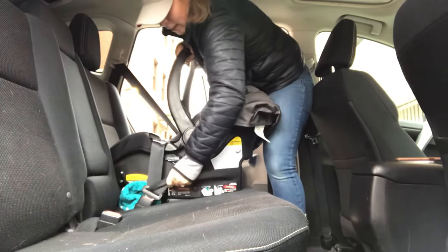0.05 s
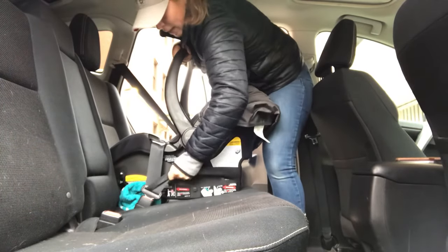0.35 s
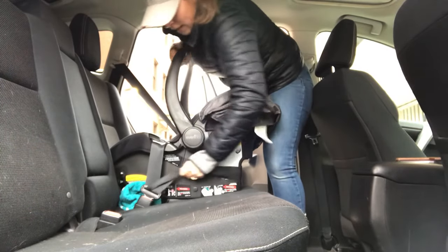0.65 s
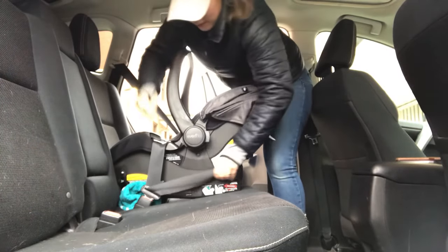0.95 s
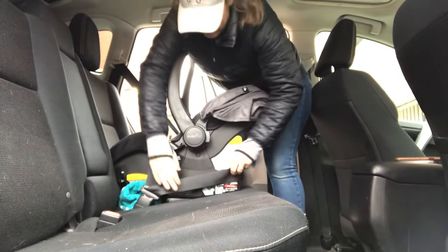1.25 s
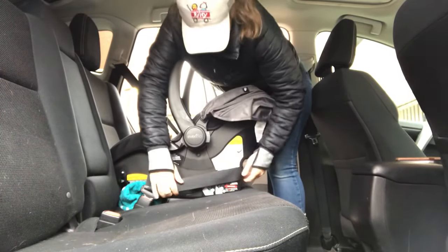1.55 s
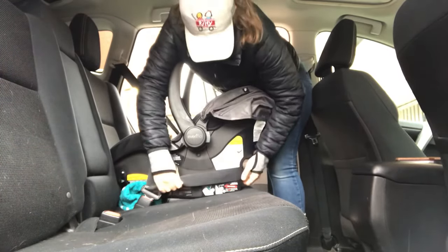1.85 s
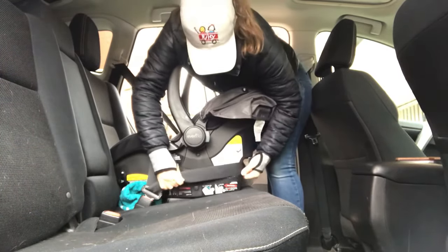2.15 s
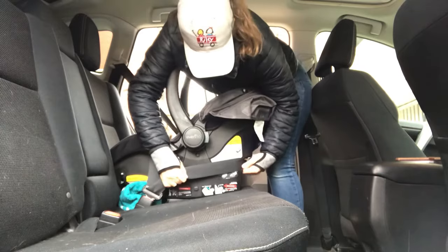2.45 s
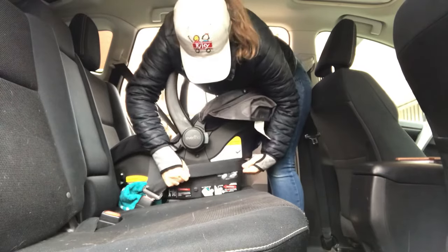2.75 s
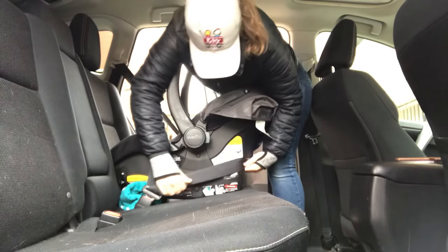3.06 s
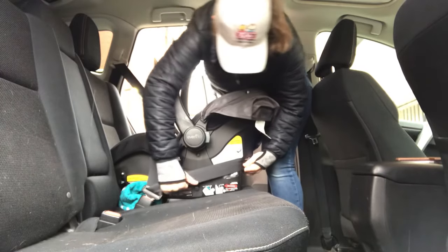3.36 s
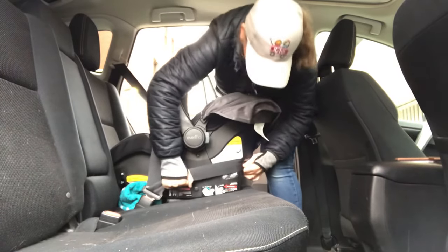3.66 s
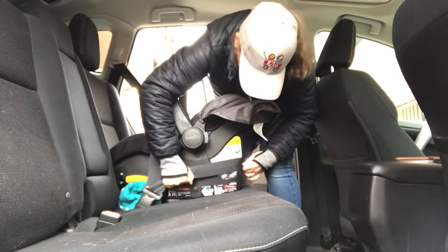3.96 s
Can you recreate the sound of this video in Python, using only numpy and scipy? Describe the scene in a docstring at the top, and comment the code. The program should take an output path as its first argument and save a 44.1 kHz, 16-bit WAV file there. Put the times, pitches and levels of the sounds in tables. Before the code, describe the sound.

Inside a parked car, a seat belt is tugged around a child seat with small ticks and hollow knocks, followed by two latch snaps and a short tightening zip. Close jacket rustling, a low hum and dull traffic continue underneath.

```python
"""Buckling a child seat

Inside a parked car a seat belt is drawn across a child seat. The belt ticks as it runs out and
rasps through its guide, the plastic shell knocks, and a latch snaps twice, the second time sharply.
Then the belt zips tight. A padded nylon jacket swishes with every reach, over a steady machine hum
and the rumble of traffic."""
import sys
import numpy as np
from scipy import signal
from scipy.fft import rfft, irfft, next_fast_len
from scipy.io import wavfile
from scipy.ndimage import map_coordinates

SR = 44100
rng = np.random.default_rng(int(sys.argv[2]) if len(sys.argv) > 2 else 0)


def digitize_waveform(pressure):
    """Quantize a signal to 16-bit integers and store it at the path in sys.argv[1].

    Rows of a 2-D input are taken as channels; values are limited to [-1, 1].
    """
    field = np.atleast_2d(pressure).T
    bounded = np.clip(field, -1, 1)
    quanta = np.round(bounded * 32767).astype(np.int16)
    wavfile.write(sys.argv[1], SR, quanta)


N = 176400  # 4 seconds

# Tugs on the belt: start_s, length_s, level_db, tilt_db_per_octave, ring_hz, ring_boost_db
BELT_TUGS = [(0.092, 0.048, -55, -1, 7000, 0), (0.476, 0.18, -62, -4, 4030, 8),
             (0.687, 0.046, -49.5, -2.5, 4570, 7), (0.751, 0.016, -45, 1.5, 2980, 6),
             (0.78, 0.025, -49.5, 0, 2300, 3), (0.951, 0.087, -55.5, -0.5, 2870, 9),
             (1.093, 0.029, -54.5, 3.5, 11500, 2), (3.16, 0.303, -60, -5, 2050, 7)]
# The rasp's tone colour (how strong its lows and highs are): pitch_hz, level_db
RASP_COLOUR = [(200, -23), (700, -1), (2400, -1), (3400, -4), (4400, -4), (6000, -9.5), (8000, -10.5),
               (9500, -10), (10400, -20), (11500, -15), (15500, -26)]
# Where every rasp rings: pitch_hz, width_hz, boost_db
RASP_PEAKS = [(2060, 130, 3), (2950, 84, 4.5), (3860, 170, 5.5), (4620, 140, 4), (5480, 150, 10),
              (6900, 170, 8.5), (8380, 88, 0), (9200, 170, 3), (11700, 160, 6), (14400, 150, 8)]
# The one pull that tightens the belt: start_s, length_s, level_db
TIGHT_PULL = (2.999, 0.085, -48.5)
# Tone colour of that pull: pitch_hz, level_db
PULL_COLOUR = [(200, 4), (750, 2.5), (1400, -1.5), (2400, -1), (3100, -2.5), (4000, -9), (6500, -13.5),
               (9800, -12.5), (10500, -16.5), (15500, -19)]
# Where the tight belt rings: pitch_hz, width_hz, boost_db
PULL_PEAKS = [(1160, 51, 5.5), (5150, 130, 10), (6000, 90, 4), (6750, 120, 5), (7380, 100, 5),
              (11300, 200, 9), (13500, 200, 6), (15220, 130, 9)]
# Ticks of the running belt: start_s, level_db
BELT_TICKS = [(0.015, -52), (.049, -55), (.066, -52.5), (.085, -52), (.152, -49.5), (.1715, -48),
              (.187, -54), (0.2028, -49.5), (0.226, -54), (.231, -57), (0.251, -53.5), (.2838, -54.5),
              (.3152, -54), (0.337, -57), (.3595, -58), (.4145, -56), (.5008, -55), (.519, -67),
              (1.8735, -49.5), (2.0594, -47.5), (2.5755, -53.5), (2.786, -54.5)]
# Tone colour of a tick: pitch_hz, level_db
BELT_TICK_COLOUR = [(500, -23), (2000, 9), (4000, 1.5), (6500, 0.5), (9000, -6.5), (10400, -11),
                    (11800, -7), (15500, -13)]

# Snaps of the latch: start_s, level_db, treble_cut_hz, bass_cut_hz
LATCH_SNAPS = [(1.0554, -33, 6040, 2200), (2.6278, -31, 19000, 400)]
# Notes the latch rings at: pitch_hz, level_db, fade_s (time to fall by 60 dB)
LATCH_NOTES = [(1448, -7, 0.026), (2200, -13, .03), (4000, -12, 0.015), (4650, -0.5, 0.028),
               (5720, -11, .018), (5900, -9, .016), (6930, -5, 0.025), (7700, -9, 0.029),
               (8700, -13, 0.014), (9640, -4, 0.012), (10140, -15, 0.01), (12500, -3, 0.0087),
               (13400, -10, .013)]
# Tone colour of the latch's crack: pitch_hz, level_db
LATCH_COLOUR = [(300, -5), (1400, 4), (3500, 1.5), (7000, 0), (10000, -1.5), (11500, -8.5), (13300, -10),
                (15500, -15)]
# Knocks on the plastic shell: start_s, level_db, tilt_db_per_khz
SHELL_KNOCKS = [(0.0222, -46, 2), (.038, -38, -0.5), (.4622, -27, -0.3)]
# Notes the shell rings at: pitch_hz, level_db, fade_s
SHELL_NOTES = [(783, -4, 0.03), (1335, 2, 0.017), (1520, -3.5, 0.025), (2140, -5, 0.016),
               (3090, -10, 0.013), (3820, -12, .02)]
# Tone colour of the shell's crack: pitch_hz, level_db
SHELL_COLOUR = [(300, -3), (900, -8), (1600, 11.5), (4000, -8), (7500, -12), (10000, -24), (15500, -28)]

# How loud the jacket swishes: time_s, level_db
SWISH_LEVELS = [(0, -65.5), (.2, -78), (.43, -75), (.52, -62.5), (.63, -53.5), (.82, -55.5), (.88, -58),
                (1.0, -53.5), (1.12, -55), (1.2, -54), (1.5, -55), (1.62, -59), (1.72, -65.5), (1.85, -61),
                (2.0, -58.5), (2.16, -56.5), (2.25, -63), (2.36, -68), (2.49, -67.5), (2.55, -60.5),
                (2.62, -71), (2.7, -64.5), (2.78, -63), (2.83, -74), (2.95, -59.5), (3.15, -57),
                (3.38, -54), (3.52, -57.5), (3.6, -61.5), (3.68, -58.5), (3.8, -68), (4, -86)]
# Tone colour of rubbing nylon: pitch_hz, level_db
SWISH_COLOUR = [(300, 7), (1100, 2.5), (2150, 3), (2700, -2), (3450, 2), (4800, -4), (5400, -3.5),
                (6000, -5), (6600, -4.5), (7700, -10), (9600, -13.5), (10400, -20), (11400, -11.5),
                (15500, -21)]
# Tone colour of the nylon's fine fizz: pitch_hz, level_db
FIZZ_COLOUR = [(2000, -25), (6000, 4), (9000, 2), (10400, -1), (12000, -4), (15500, -1)]

# Tones of the steady hum: multiple (of HUM_HZ), level_db
HUM_TONES = [(1, -40.5), (2, -49.5), (5, -66)]
# Tones of the fan's whine: pitch_hz, level_db
FAN_TONES = [(236, -55), (635.5, -71), (678, -74.5), (706, -73), (1051, -70.5), (2049, -76.5), (3084, -98)]
# How loud the traffic is: time_s, level_db
RUMBLE_LEVELS = [(0, -40.5), (.45, -40.5), (.7, -42), (1.4, -42.5), (1.8, -41.5), (2.5, -41.5), (3.2, -42),
                 (3.8, -41.5), (4, -40)]
# Tone colour of traffic heard inside the car: pitch_hz, level_db
RUMBLE_COLOUR = [(20, -21), (30, -12), (50, -3), (65, 1), (100, -1.5), (142, -0.5), (155, -5.5), (190, -5),
                 (270, -9.5), (350, -15), (420, -17), (520, -22), (750, -23.5), (1200, -25), (1800, -34.5),
                 (3500, -45), (7000, -52), (10300, -59.5), (15500, -61)]
# How long the cabin echoes: pitch_hz, fade_s
CABIN_FADES = [(200, 0.17), (2000, 0.086), (10000, 0.04)]

BRISK_DB, FIZZ_DB, FIZZ_GROWTH = -55.5, -9.5, 1.4  # a brisk swish; fizz relative to it; dB per swish dB
HUM_HZ, TOP_HZ = 120, 15830
CABIN_DB, BOUNCE_DB = -12, -21


def belt_rasps():
    """Each tug drags the weave over the guide in a short grainy rasp with a ring of its own."""
    out, t = np.zeros(N), np.arange(SR // 2) / SR
    for start_s, length_s, db, tilt_db, ring_hz, ring_db in BELT_TUGS:
        peaks = list(RASP_PEAKS) + [(ring_hz, 310, ring_db)]  # the ring is 310 Hz wide
        rasp = noise(RASP_COLOUR, len(t), grain_db=5, tilt_db=tilt_db, peaks=peaks)
        add(out, start_s, amp(db) * stroke(t, length_s) * rasp)
    return out


def belt_zip():
    """Pulled tight, the belt zips through the guide and rings."""
    out, t = np.zeros(N), np.arange(SR // 4) / SR
    start_s, length_s, db = TIGHT_PULL
    rasp = noise(PULL_COLOUR, len(t), grain_db=6.5, peaks=PULL_PEAKS)
    add(out, start_s, amp(db) * stroke(t, length_s) * rasp)
    return out


def belt_ticks():
    """The belt catches and slips in small dry ticks."""
    out, t = np.zeros(N), np.arange(SR // 16) / SR
    shape = rise(t, attack_s=0.00051) * fade(t, fade_s=0.032)
    for start_s, db in BELT_TICKS:
        add(out, start_s, amp(db) * shape * noise(BELT_TICK_COLOUR, len(t)))
    return out


def latch_snaps():
    """The latch snaps and rings; the softer snap is duller and thinner."""
    out = np.zeros(N)
    for start_s, db, treble_cut_hz, bass_cut_hz in LATCH_SNAPS:
        snap = strike(LATCH_NOTES, LATCH_COLOUR, crack_db=0, crack_fade_s=0.03)
        band = lambda hz: hz / np.hypot(hz, bass_cut_hz) / np.hypot(1, (hz / treble_cut_hz) ** 2)
        add(out, start_s, amp(db) * filtered(snap, band))
    return out


def shell_knocks():
    """Tight hollow knocks on the child seat, each with its own brightness."""
    out = np.zeros(N)
    for start_s, db, tilt_db in SHELL_KNOCKS:
        knock = strike(SHELL_NOTES, SHELL_COLOUR, crack_db=-7, crack_fade_s=0.024)
        tilt = lambda hz: amp(tilt_db * np.minimum(hz, 5000) / 1000)
        add(out, start_s, amp(db) * filtered(knock, tilt))
    return out


def strike(notes, colour, crack_db, crack_fade_s):
    """One hard hit: a few fading notes and a noisy crack whose treble dies first."""
    t = np.arange(SR // 8) / SR
    ring = sum(amp(db + rng.normal()) * fade(t, fade_s) * sine(hz, t) for hz, db, fade_s in notes)
    burst = noise(colour, len(t))
    body = filtered(burst, lambda hz: 1 / (1 + (hz / 10700) ** 4))
    treble = burst - body
    crack = body * fade(t, crack_fade_s) + treble * fade(t, 0.75 * crack_fade_s)
    return (ring + amp(crack_db) * crack) * rise(t, attack_s=0.0003)


def jacket_swish():
    """Nylon slides on nylon; brisk moves add a fine fizz, so faster sounds brighter."""
    level_db = over_time(SWISH_LEVELS) + 0.6 * wobble(34.97)
    swish = amp(level_db) * noise(SWISH_COLOUR, N, grain_db=3)
    fizz_db = BRISK_DB + FIZZ_DB + FIZZ_GROWTH * (level_db - BRISK_DB)
    return swish + amp(fizz_db) * noise(FIZZ_COLOUR, N)


def machine_hum():
    """A low electrical-sounding hum holds steady; a fan adds a faint, slightly unsteady whine."""
    t = np.arange(N) / SR
    fan_time = t + 0.0021 * np.cumsum(wobble(6)) / SR  # the fan's tones drift together
    tone = lambda hz, db, time: amp(db + 0.5 * wobble(12)) * np.sqrt(2) * sine(hz, time)
    hum = sum(tone(round(multiple) * HUM_HZ, db, t) for multiple, db in HUM_TONES)
    whine = sum(tone(hz, db, fan_time) for hz, db in FAN_TONES)
    return hum + whine


def traffic_rumble():
    """Traffic outside makes a dull rumble that swells a little."""
    level_db = over_time(RUMBLE_LEVELS) + 0.58 * wobble(9)
    return amp(level_db) * noise(RUMBLE_COLOUR, N)


def cabin_echo(x):
    """The padded cabin answers with a short echo that loses its treble first."""
    hz, t, bands = signal.stft(rng.standard_normal(SR // 5), SR, nperseg=128)
    fading = bands * fade(t, over_pitch(CABIN_FADES, hz)[:, None])
    tail = signal.istft(fading, SR, nperseg=128)[1]
    echo = np.pad(tail / np.linalg.norm(tail), (SR // 500, 0))  # arrives 2 ms late
    return signal.fftconvolve(x, echo)[:N]


def with_bounces(x, count=6, delay_s=0.00202, drift_s=0.00015):
    """Add bounces off the seat and door; their paths shift slowly as the arms move."""
    delays = [delay_s * rng.uniform(0.2603, 1) + drift_s * wobble(1.91) for _ in range(count)]
    bounces = sum(map_coordinates(x, [np.arange(N) - delay * SR], order=3) for delay in delays)
    gain = amp(BOUNCE_DB)
    return (x + gain * bounces) / np.sqrt(1 + count * gain ** 2)


def noise(colour, size, grain_db=0, tilt_db=0, peaks=()):
    """Shaped noise of strength 1; grain_db makes it rougher, tilt_db (per octave) brighter."""
    grains = rng.standard_normal(size) * amp(grain_db * rng.standard_normal(size))
    boost = lambda hz: sum(db / (1 + ((hz - centre) / width) ** 2) for centre, width, db in peaks)
    octaves = lambda hz: np.log2(np.maximum(hz, 500) / 1000)
    shaped = filtered(grains, lambda hz: amp(over_pitch(colour, hz) + boost(hz) + tilt_db * octaves(hz)))
    return shaped / np.sqrt(np.mean(shaped ** 2) + 1e-20)


def stroke(t, length_s, release_s=0.012):
    """The loudness of one pull: a quick start, a hold and a short fade."""
    return rise(t, attack_s=0.0014) * np.exp(-np.maximum(t - length_s, 0) / release_s)


def rise(t, attack_s):
    """Climb from 0 towards 1."""
    return 1 - np.exp(-t / attack_s)


def fade(t, fade_s):
    """Fall by 60 dB every fade_s seconds."""
    return amp(-60 * t / fade_s)


def sine(hz, t):
    """A pure tone that starts anywhere in its cycle."""
    return np.sin(2 * np.pi * (hz * t + rng.random()))


def wobble(rate):
    """A smooth curve through rate random points a second."""
    points = rng.standard_normal(int(N * rate / SR) + 4)
    return map_coordinates(points, [np.arange(N) * rate / SR])


def amp(db):
    """Turn decibels into a multiplier."""
    return 10 ** (np.asarray(db) / 20)


def over_time(table):
    """Join a table's points into one value for each sample."""
    return np.interp(np.arange(N) / SR, *np.transpose(table))


def over_pitch(table, hz):
    """Read between a table's pitches, giving each octave equal room."""
    pitches, values = np.transpose(table)
    return np.interp(np.log(hz + 1), np.log(pitches + 1), values)


def filtered(x, gain_at):
    """Turn each frequency up or down by gain_at(hz)."""
    size = next_fast_len(len(x) + 8192)
    hz = np.fft.rfftfreq(size, 1 / SR)
    return irfft(rfft(x, size) * gain_at(hz), size)[:len(x)]


def add(track, start_s, sound):
    """Mix a sound into the track at start_s."""
    part = track[max(round(start_s * SR), 0):][:len(sound)]
    part += sound[:len(part)]


def scene():
    """Belt, seat and jacket in the cabin, over hum and traffic."""
    hits = latch_snaps() + shell_knocks() + belt_ticks()
    cloth = with_bounces(belt_rasps() + belt_zip() + jacket_swish())
    echo = amp(CABIN_DB) * cabin_echo(hits)
    return (hits + echo + cloth + machine_hum() + traffic_rumble())[None]


def record(dry):
    """Cut away everything above TOP_HZ."""
    return filtered(dry[0], lambda hz: hz < TOP_HZ)[None]


dry = scene()
out = record(dry)
digitize_waveform(out)
```